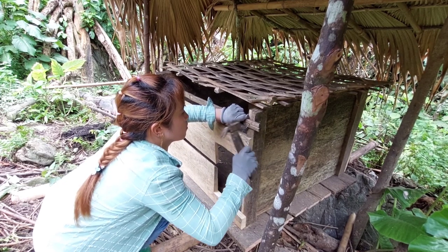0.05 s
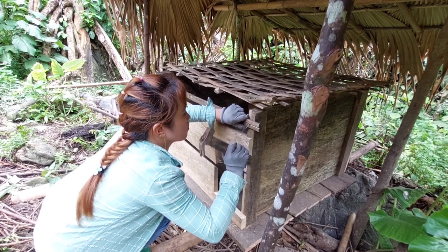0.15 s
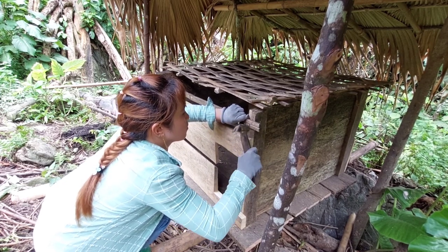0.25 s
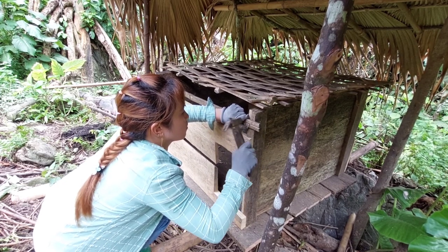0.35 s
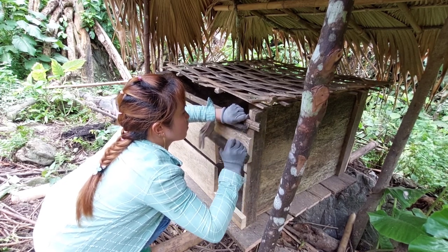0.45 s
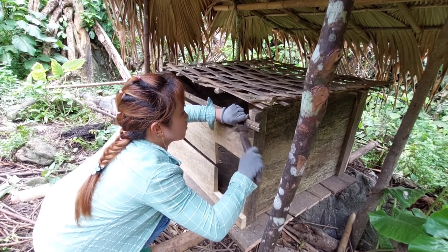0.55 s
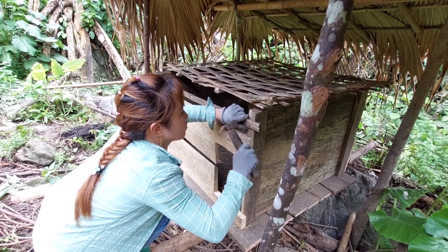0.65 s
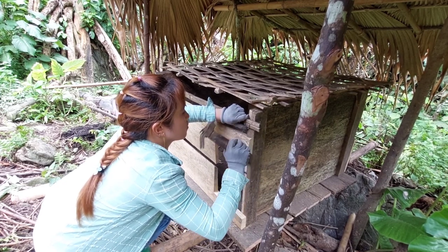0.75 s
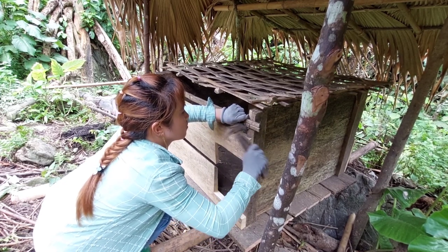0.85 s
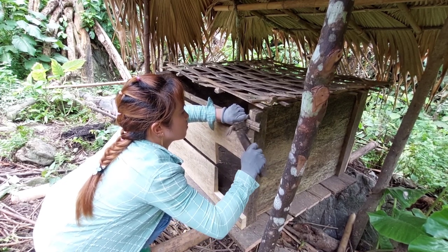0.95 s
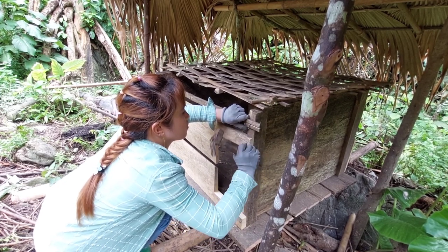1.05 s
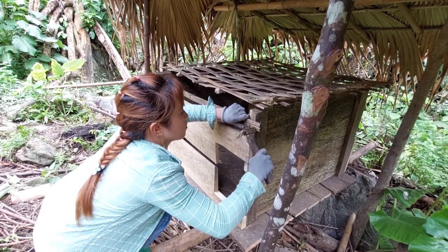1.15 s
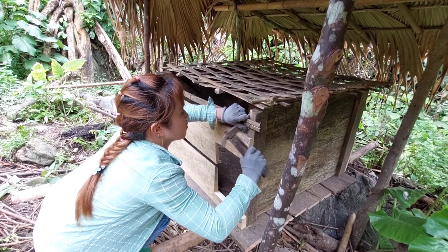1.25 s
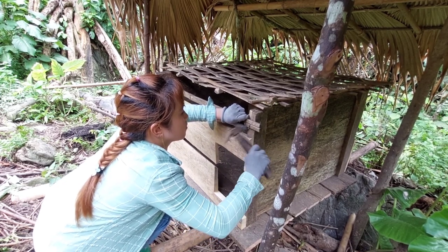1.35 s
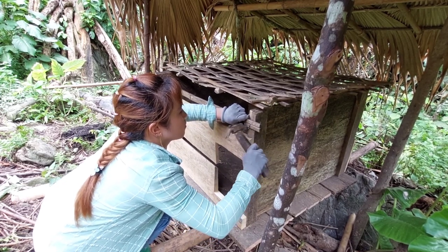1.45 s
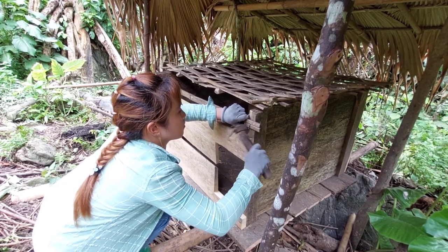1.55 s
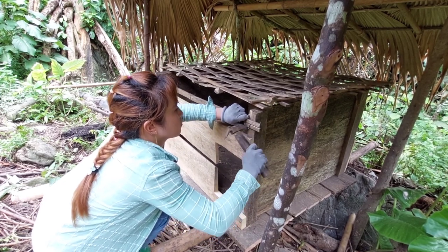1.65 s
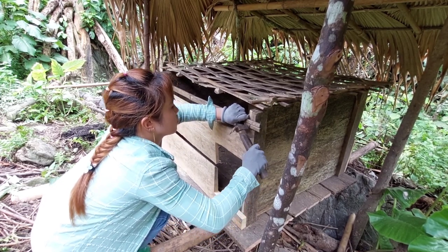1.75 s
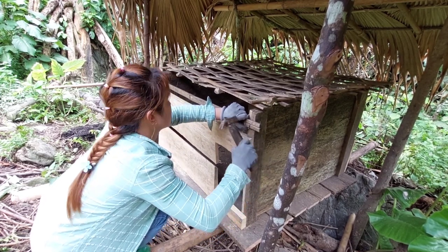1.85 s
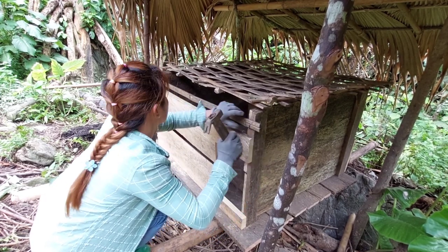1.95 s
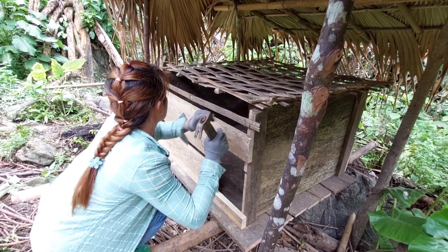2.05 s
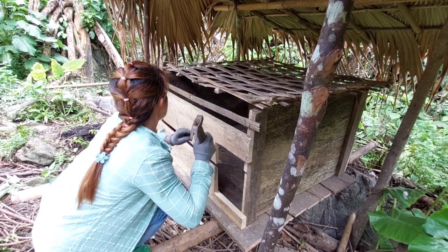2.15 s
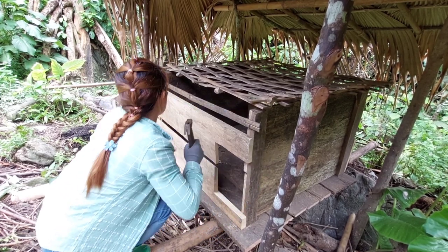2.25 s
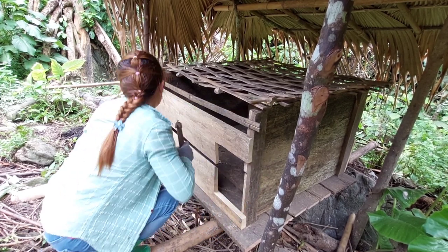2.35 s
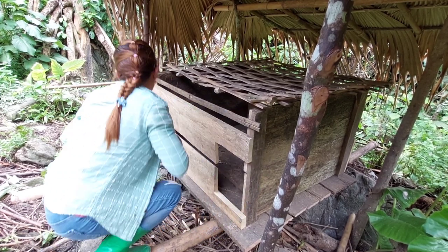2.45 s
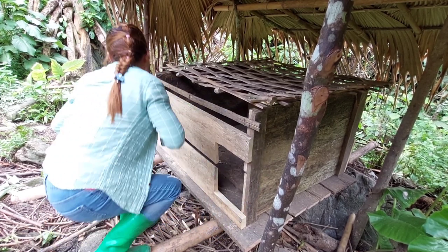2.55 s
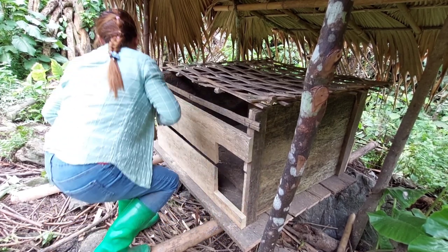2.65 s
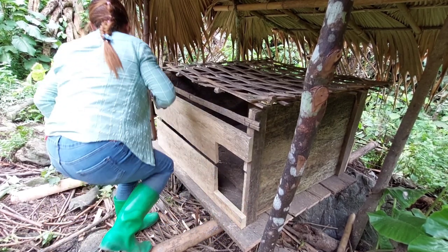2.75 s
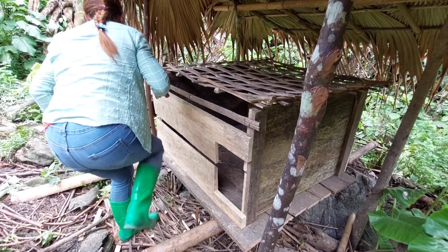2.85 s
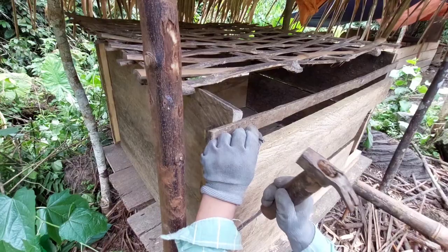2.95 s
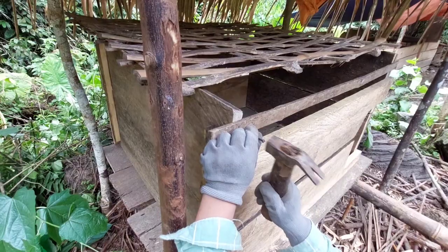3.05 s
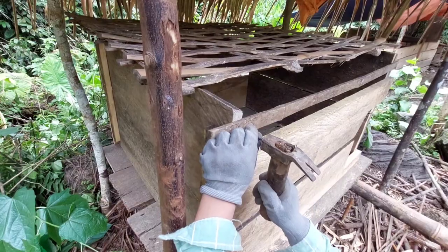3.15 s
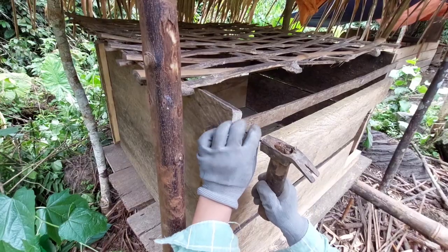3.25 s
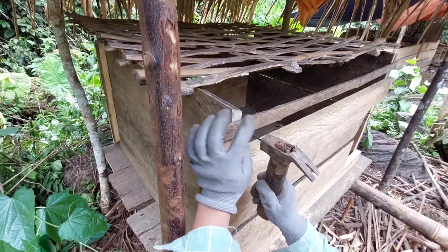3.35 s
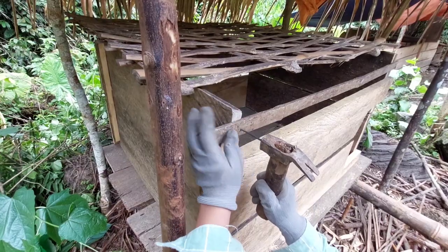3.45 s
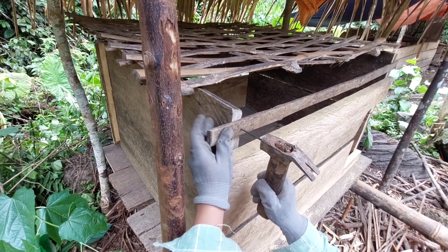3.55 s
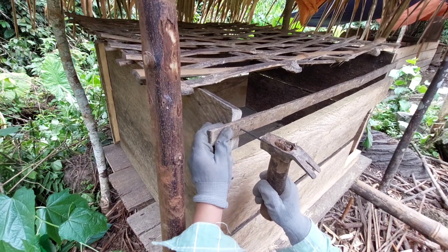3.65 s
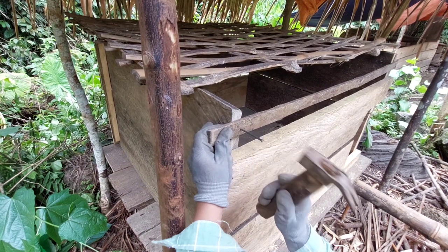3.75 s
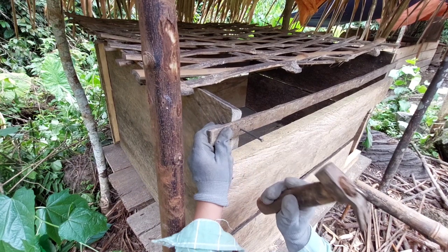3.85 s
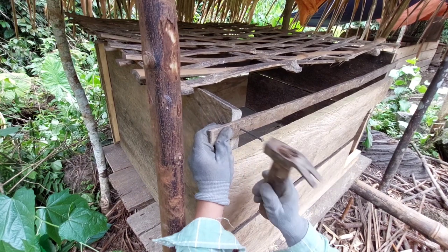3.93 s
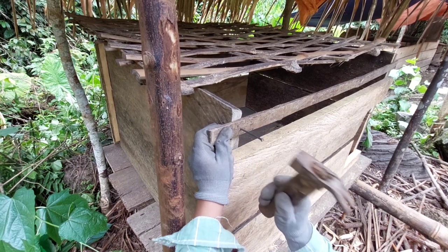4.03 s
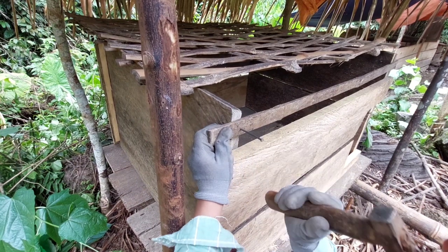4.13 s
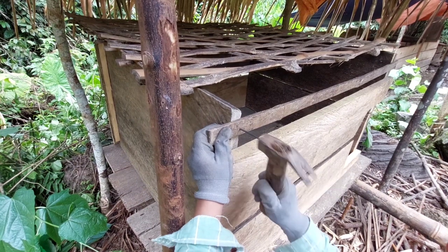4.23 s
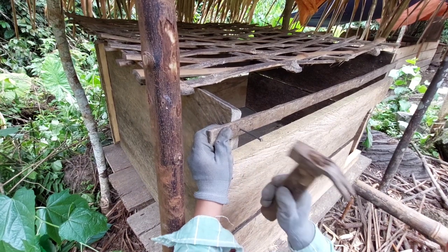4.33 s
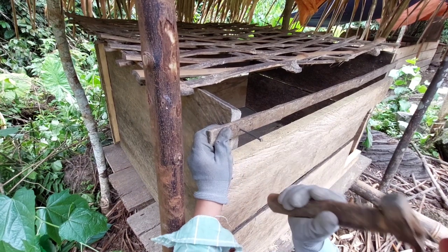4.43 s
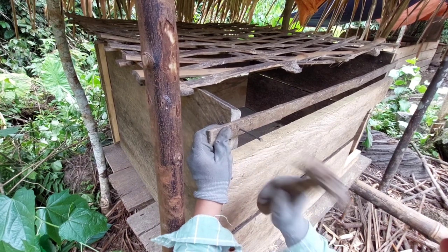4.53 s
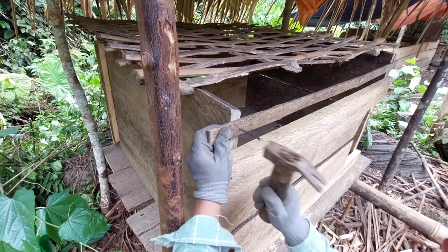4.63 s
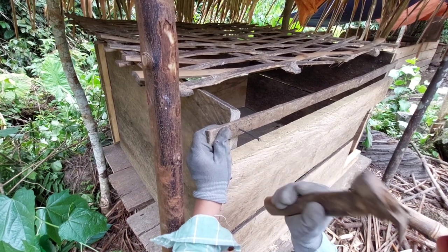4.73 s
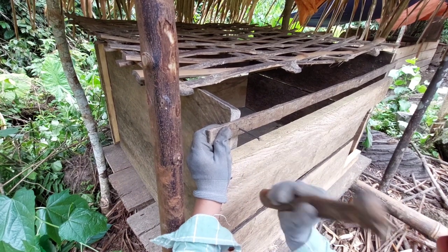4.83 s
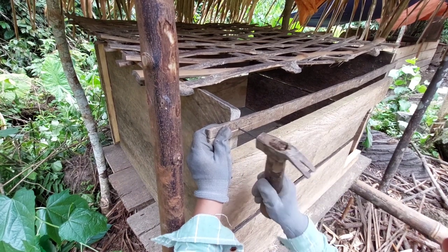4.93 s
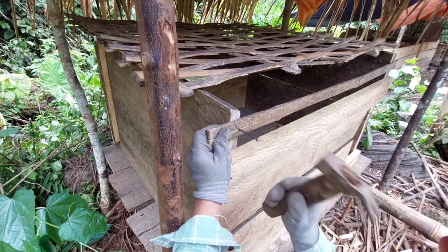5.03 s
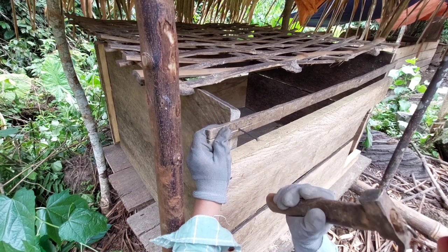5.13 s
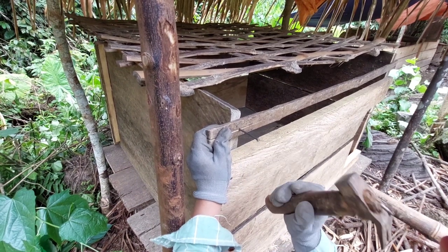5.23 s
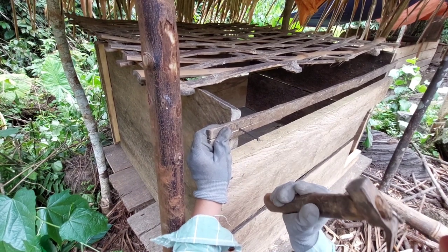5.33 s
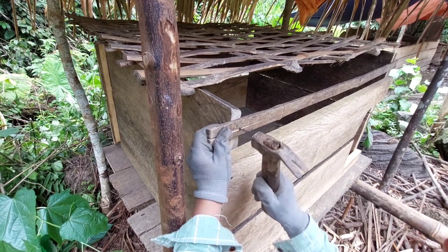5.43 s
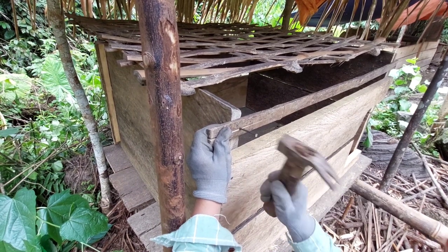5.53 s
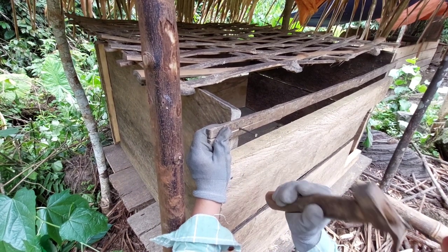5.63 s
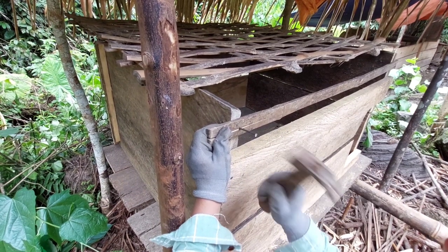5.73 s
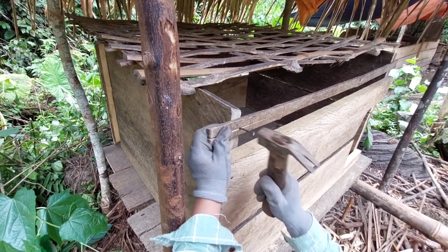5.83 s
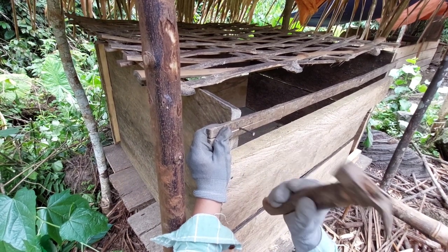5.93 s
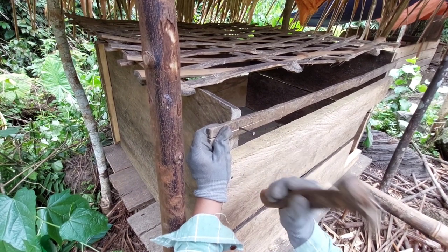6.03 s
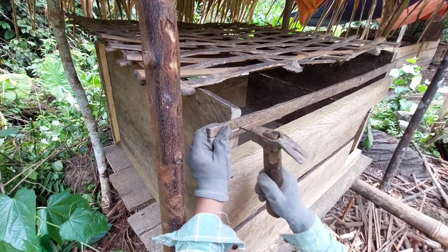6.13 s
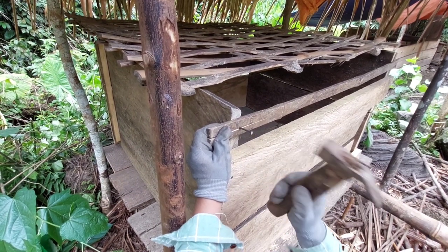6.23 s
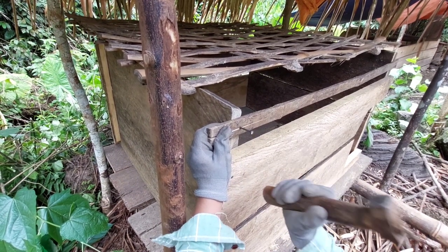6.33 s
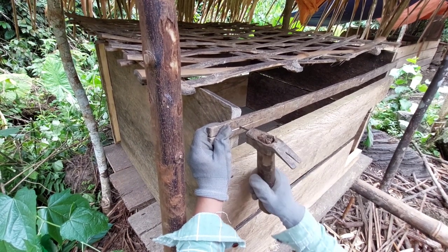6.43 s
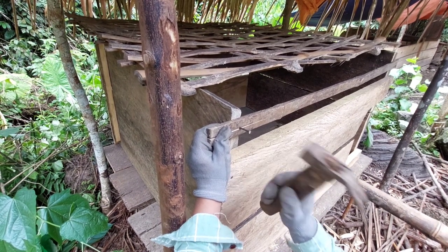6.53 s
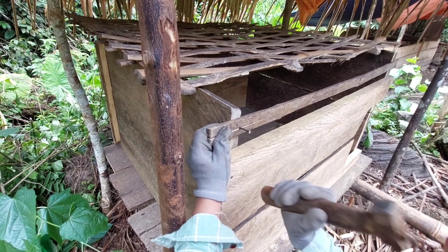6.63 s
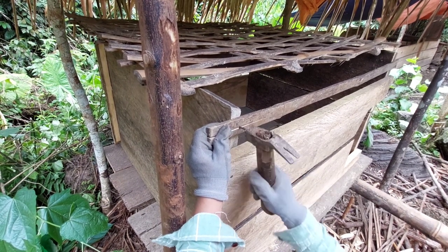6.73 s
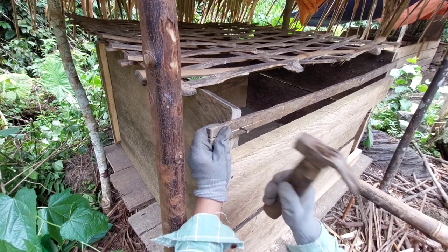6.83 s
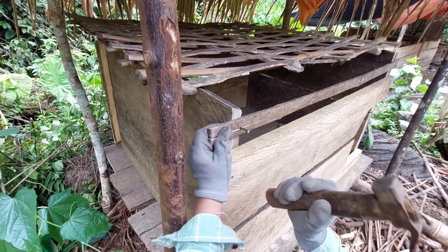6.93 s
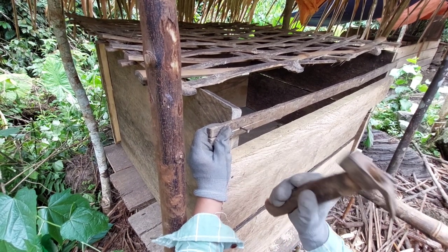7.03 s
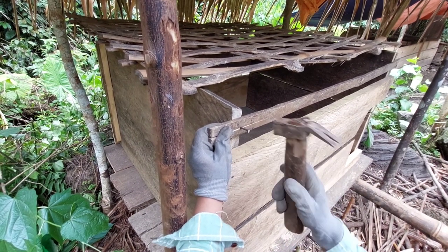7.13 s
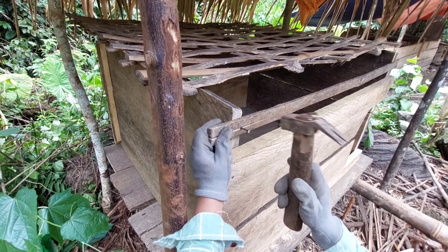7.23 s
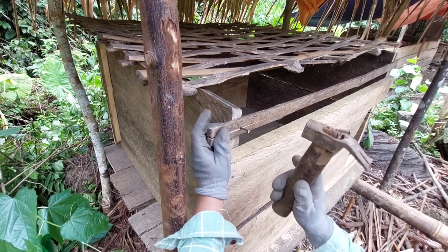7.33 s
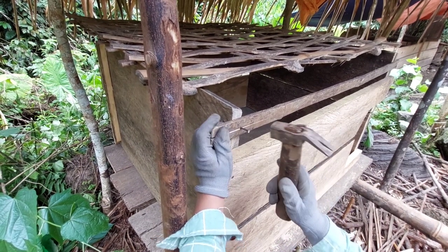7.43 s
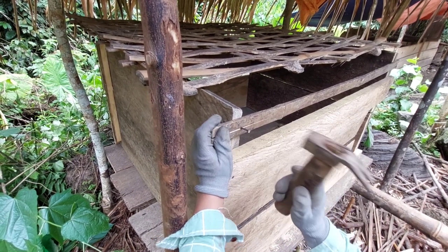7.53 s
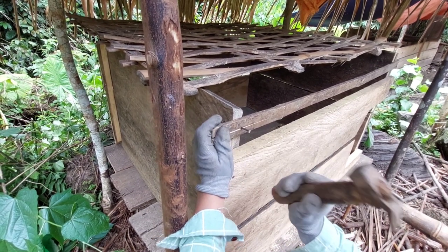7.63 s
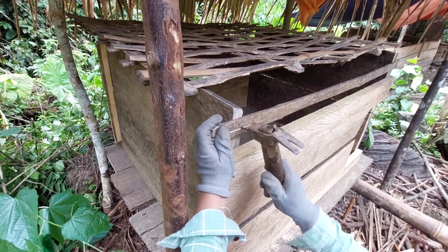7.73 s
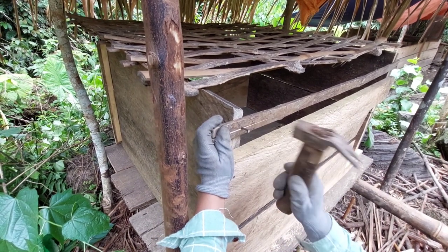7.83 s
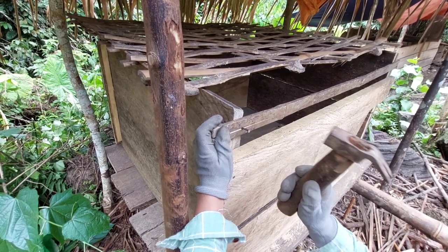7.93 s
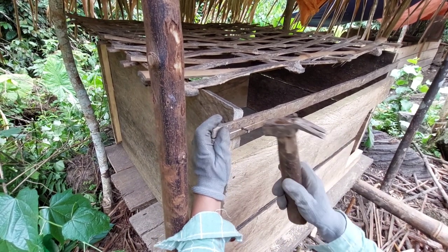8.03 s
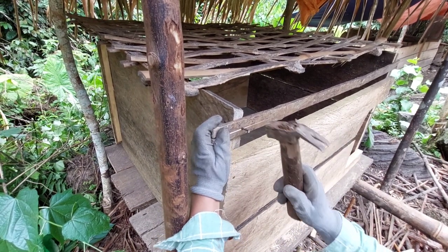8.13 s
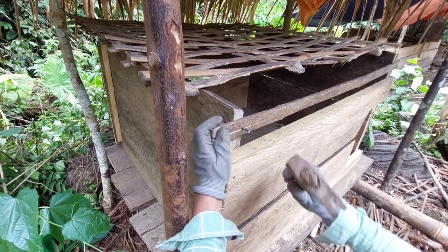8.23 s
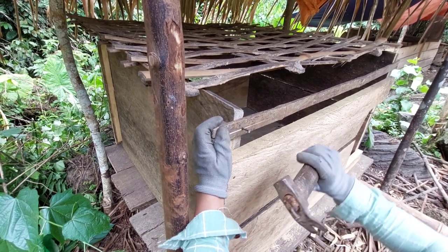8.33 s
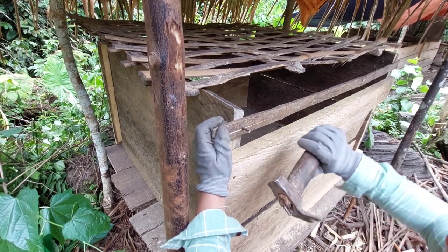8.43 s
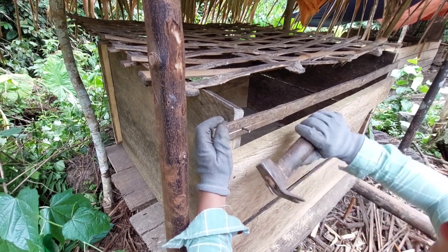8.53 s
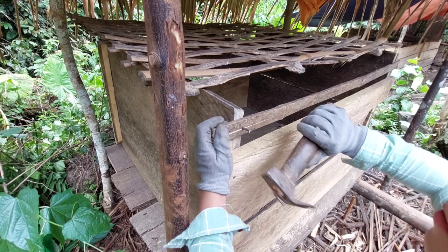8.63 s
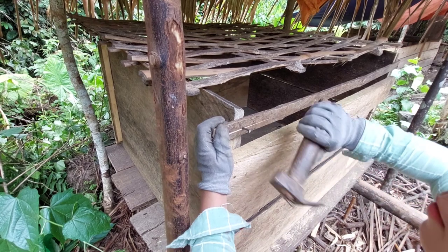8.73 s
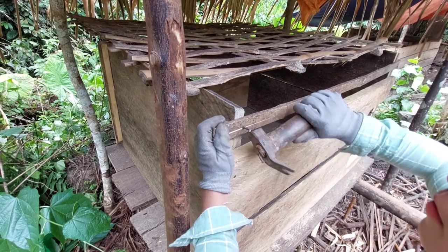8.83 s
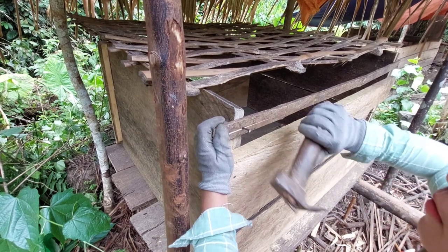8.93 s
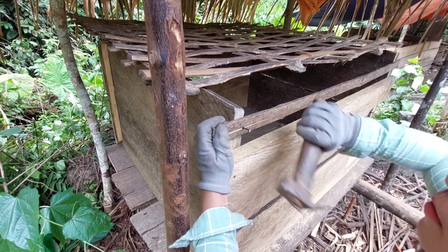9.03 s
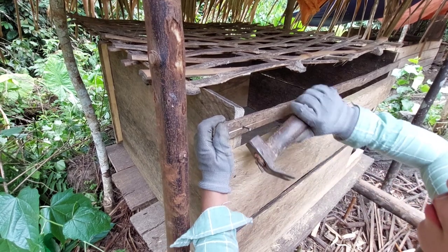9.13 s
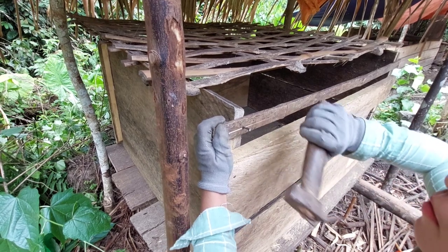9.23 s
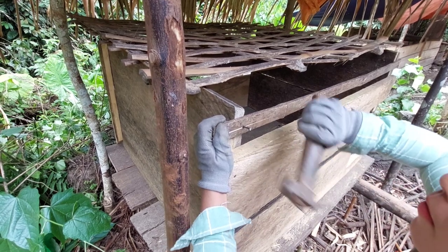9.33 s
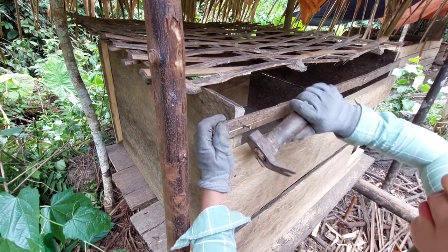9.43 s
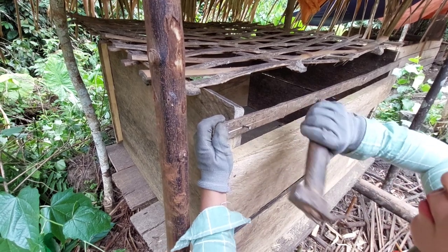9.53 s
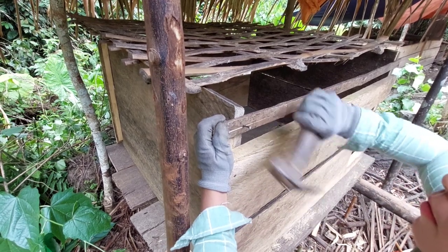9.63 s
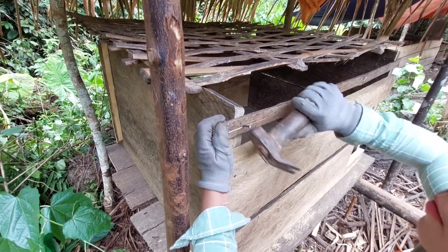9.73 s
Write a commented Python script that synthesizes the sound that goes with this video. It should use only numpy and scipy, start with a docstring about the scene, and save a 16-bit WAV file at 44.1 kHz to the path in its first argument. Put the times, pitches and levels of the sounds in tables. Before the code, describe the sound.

Close stereo sound of nailing at a wooden shelter. Metallic ticks and hollow board knocks run rapidly for two seconds, then stop, leaving a quiet hiss of water, leaves and far insects. Two light taps and a double strike resume the work, followed by steadier blows of varying force, some dull, some piercing, with short scattered rattle, occasional soft air thumps on the left, and three final knocks.

```python
"""A stream, leaves and far insects hiss in a forest clearing: filtered noise with slowly varying level.
Almost at once a steel hammer drives nails into the slats of a small wooden hut. Each blow is a tick of steel
(noise burst and decaying sine), a knock of the boards (a bank of damped modes), then the loose slat slapping its frame.
Woven walls and thatch scatter the sound as fading noise. Single boards ring on, small knocks fall between,
and the swung hammer puffs air into one of the two close microphone ports."""
import sys
import numpy as np
from scipy import signal
from scipy.fft import rfft, irfft
from scipy.io import wavfile
from scipy.ndimage import uniform_filter1d, map_coordinates

SR = 44100
rng = np.random.default_rng(int(sys.argv[2]) if len(sys.argv) > 2 else 0)


def unload_wav(signal):
    """Save mono or channel-first audio to the path in sys.argv[1] as 16-bit WAV at rate SR, clipped to [-1, 1]."""
    wavfile.write(
        sys.argv[1],
        SR,
        np.round(np.clip(np.atleast_2d(signal).T, -1, 1) * 32767).astype(np.int16),
    )


def convert_level_to_amplitude(level_db):
    """Map a level in decibels to its linear amplitude factor."""
    exponent = np.asarray(level_db, float) / 20
    return 10 ** exponent


N = 430857  # length in samples

# Background levels. Each row: time in seconds, rumble level in dB, rush level in dB.
FOREST_LEVELS = [(0.0, -46, -49.5), (0.85, -44, -48), (1.2, -47.5, -52.5), (2.0, -47.5, -51),
                 (2.75, -45.5, -49), (3.07, -43, -45.5), (3.2, -48, -49.5), (4.0, -47, -50),
                 (4.27, -42.5, -44.5), (4.5, -46, -49), (5.4, -48.5, -50), (6.2, -46, -50),
                 (6.45, -42.5, -45.5), (7.75, -45.5, -48.5), (8.2, -40.5, -44.5), (8.7, -43, -44.5),
                 (9.2, -38.5, -43), (9.77, -39.5, -44)]
# Spectrum of the low rumble. Each row: frequency in Hz, relative level in dB.
RUMBLE_SPECTRUM = [(15, -56), (25, -27), (50, 4), (129, -1), (236, -8), (280, -7.5), (430, -8.5),
                   (648, -11.5), (1500, -19), (1950, -89), (3300, -120)]
# Spectrum of stream and leaves. Each row: frequency in Hz, relative level in dB.
RUSH_SPECTRUM = [(530, -26), (900, -25), (1030, -24), (1670, -1.5), (3310, -5.5), (3880, -3.5), (5790, -4),
                 (6620, -7.5), (7660, -6), (8760, -7), (15000, -17), (15900, -30), (16500, -63)]
# Insect choruses. Each row: centre in Hz, half-width to 1/e amplitude in Hz, mean level in dB.
INSECT_CHORUSES = [(5720, 870, -56.5), (7520, 670, -54.5), (9440, 120, -64)]
# Likeness of the two ports in the background. Each row: frequency in Hz, correlation from -1 to 1.
FOREST_LIKENESS = [(60, 0.93), (130, 0.92), (290, 0.88), (640, -0.21), (1410, -0.28), (3100, 0.077),
                   (6820, -0.036), (15000, 0.12)]
# Hammer on nail. Each row: start in seconds, tick level in dB, clatter level in dB, sizzle level in dB,
# pitch of the nail's shank in Hz.
HAMMER_BLOWS = [(0.0447, -5.5, -17, -32, 5800), (0.3461, -11, -28, -33, 6350),
                (0.6554, -9.5, -24.5, -36.5, 6770), (0.9659, -4.5, -22, -41, 6280),
                (1.2313, -3.5, -23, -34, 8230), (1.471, -7.5, -25, -43, 6070),
                (1.6636, -12.5, -24.5, -36, 4780), (1.8428, -14, -25, -35, 5100),
                (3.1805, -15, -23.5, -40, 4180), (3.2269, -19, -32, -48, 4200),
                (4.077, -15.5, -19, -31.5, 4300), (4.362, -38, -19, -33, 4530),
                (4.6863, -15, -16.5, -24.5, 5100), (5.0133, -31, -16.5, -23.5, 5050),
                (5.558, 0, -24, -26.5, 3720), (5.8864, -34.5, -30.5, -27, 2920),
                (6.2126, -5.5, -20, -20.5, 4600), (6.532, -2, -20, -21, 4650),
                (6.8348, -11, -23.5, -28, 7970), (7.8307, -20, -23, -21.5, 5500),
                (8.9242, -25, -27, -31.5, 4730), (9.2101, -9, -25.5, -23, 7800),
                (9.5036, -26, -29.5, -24, 7900)]
# Slat on frame, once after each blow. Each row: start in seconds, then the levels of body, bark, edge
# and boom in dB.
SLAT_SLAPS = [(0.054, -5, -30, -9.5, -24.5), (0.355, -15, -22, -17, -23.5), (0.662, -10, -8, -13, -22),
              (0.974, -8.5, -8.5, -12, -25.5), (1.239, -9, -18.5, -18, -29), (1.48, -12, -8.5, -10, -27.5),
              (1.672, -14, -7.5, -10, -27.5), (1.851, -10, -17.5, -18, -27), (3.185, -20, -16, -21, -34),
              (3.232, -29, -23.5, -30, -64), (4.084, -14.5, -20, -17.5, -35.5),
              (4.378, -24, -26, -16.5, -30.5), (4.699, -24, -33, -15, -28.5), (5.027, -18, -24, -13, -37),
              (5.563, -14.5, -21, -15, -38), (5.902, -25.5, -23, -29, -34), (6.225, -23, -22.5, -26, -27.5),
              (6.5405, -18, -15.5, -21, -27.5), (6.846, -22, -23, -18, -32.5),
              (7.843, -19.5, -21.5, -12, -27), (8.933, -5, -16, -12.5, -25.5),
              (9.22, -16.5, -17, -24.5, -28), (9.509, -16.5, -20, -19.5, -29)]
# Modes of the hut boards. Each row: frequency in Hz, basic t60 in seconds, relative level in dB when struck
# at the near corner, relative level in dB when struck at the far corner.
BOARD_MODES = [(89.7, 0.43, -2, -19), (134.5, 0.355, 2.5, 5.5), (205.6, 0.365, 0, 0.5),
               (255.8, 0.32, -2.5, -2), (290.4, 0.25, -2.5, -0.5), (350.7, 0.222, -4.5, -2),
               (458.3, 0.1436, 0.5, -6), (550, 0.094, 4.5, -15), (604, 0.12, -3, -5.5),
               (682.8, 0.16, 0.5, -8), (794, 0.087, 4.5, -6.5), (878, 0.054, 7, 0.5), (968, 0.084, -11, -6),
               (1065, 0.11, -5, -4), (1167, 0.074, -1.5, -8.5), (1400, 0.055, 4.5, -9),
               (1500, 0.08, -39.5, -24), (1796, 0.027, 2, -11), (2018, 0.067, -8, -6.5),
               (2120, 0.11, -52, -14), (2446, 0.092, -76, -15), (2910, 0.068, -68, -14.5)]
# Scattered sound of a blow, main part. Each row: frequency in Hz, relative level in dB.
CLATTER_SPECTRUM = [(60, -120), (150, 1.5), (500, -8), (1500, 3), (3000, 1), (5000, -4), (8000, -0.5),
                    (9000, -14), (10500, -120)]
# Scattered sound of a blow, top treble. Each row: frequency in Hz, relative level in dB.
SIZZLE_SPECTRUM = [(7500, -120), (9000, -4.5), (10500, 1), (13500, 0), (15500, 0), (17000, -64)]
# Decay of scattered sound. Each row: frequency in Hz, t60 in seconds.
SCATTER_DECAY = [(150, 0.4), (500, 0.23), (1500, 0.15), (4000, 0.12), (8000, 0.12), (14000, 0.14)]
# Likeness of the two ports for the hut. Each row: frequency in Hz, correlation from -1 to 1.
HUT_LIKENESS = [(60, 1), (180, 0.9), (550, 0.83), (1650, 0.026), (4970, -0.091), (15000, -0.061)]
# A loose board sounding on after every slap of a stretch. Each row: stretch start in seconds, stretch end
# in seconds, pitch picking the nearest mode in Hz, level in dB, time of free ringing in seconds.
LINGERING_BOARDS = [(.85, 1.1, 455, -13, .022), (1.1, 1.36, 552, -13, .012), (1.36, 1.76, 455, -13, .021),
                    (6.38, 6.7, 1180, -6, .006), (.85, 1.1, 1060, -29, .09), (.85, 1.57, 352, -31, .07),
                    (1.76, 2.3, 455, -18, .02), (1.36, 2.3, 1410, -19, .016), (2.8, 3.21, 975, -30, .054),
                    (3.7, 5.3, 1060, -27.5, .048), (6.06, 6.38, 975, -24, .026),
                    (6.38, 6.7, 1410, -21, .07), (7.4, 8.3, 2020, -23, .032), (8.5, 9.77, 352, -24, .06),
                    (9.07, 9.36, 134, -27, .054), (9.36, 9.77, 205, -28, .048)]
# Small knocks as the hand shifts on the slat. Each row: start in seconds, level in dB.
HAND_TAPS = [(2.815, -39), (2.934, -39)]
# Air pushed by the swung hammer. Each row: start in seconds, level in dB, time constant in seconds.
AIR_PUFFS = [(4.363, -6.5, .0015), (4.6873, -12, 0.002), (5.013, -14, 0.0015), (5.886, -9, 0.0017),
             (6.837, -12.5, 0.001)]

FOREST_TOP_HZ = 15350  # rumble and rush stop here
CORNER_CHANGE_S = 3.0  # the near corner is struck before this time, the far corner after
FREE_NEAR_S, FREE_FAR_S = 0.0094, 0.093  # how long the joint stays open after a slap
GRIP_NEAR_DB, GRIP_FAR_DB = -15, -3.5  # damping once the joint closes
KNOCK_NEAR_DB, KNOCK_FAR_DB = -6.5, -9  # knock of a blow, against the body of the slap that follows
WEAVE_NEAR_DB, WEAVE_FAR_DB = 5.5, 7  # share of lath and weave in a slap
SIDEWAYS_S = 9.0  # from here the hammer lands on its cheek and the head rings
HEAD_HZ, HEAD_DB, HEAD_T60_S = 9900, -48, .5
LINGER_LAG, PROMPT_T60_S = 0.2063, .15  # slow boards join late, by this share of their t60 beyond a prompt one's


def unit(x):
    """Normalisation: the signal is scaled to an rms of 1."""
    return x / np.sqrt(np.mean(x ** 2) + 1e-20)


def along(points, hz):
    """Logarithmic pitch scale: (Hz, value) points are interpolated over log frequency."""
    f, v = np.transpose(points)
    return np.interp(np.log(hz + 1), np.log(f + 1), v)


def wobble(rate):
    """Slow fluctuation: a smooth random curve passes through `rate` knots a second."""
    knots = rng.standard_normal(int(N * rate / SR) + 4)
    return map_coordinates(knots, [np.arange(N) * rate / SR])


def spread(alike, hz):
    """Interchannel correlation: the angle between mid and side that gives the likeness of the ports."""
    return np.arccos(np.clip(along(alike, hz), -1, 1)) / 2


def hiss(gain, alike, length, size=512):
    """Filtered noise: white noise takes its spectrum over time from gain(hz, t), its width from `alike`."""
    hz, t, z = signal.stft(rng.standard_normal((2, length)), SR, nperseg=size)
    turn = spread(alike, hz)[:, None]
    z = z * gain(hz[:, None], t) * [np.cos(turn), np.sin(turn)]
    mid, side = signal.istft(z, SR, nperseg=size)[1][:, :length]
    return np.array([mid + side, mid - side])


def add(out, s, sound):
    """Superposition: a stereo sound is summed in at time s."""
    k = round(s * SR)
    out[:, k:k + sound.shape[1]] += sound


def forest():
    """Broadband turbulence and narrow choruses: rumble, a patchy rush of water and leaves, shimmering insects."""
    s, rumble_db, rush_db = np.transpose(FOREST_LEVELS)
    t = np.arange(N) / SR
    rumble_db = np.interp(t, s, rumble_db)
    rush_db = np.interp(t, s, rush_db)

    def patchy(spectrum, patchy_db):
        """Random modulation: a spectrum with drifting patches of gain."""
        def gain(hz, t):
            field = uniform_filter1d(rng.standard_normal((len(hz), len(t))), 6, 0)
            field = uniform_filter1d(field, 12, 1)
            return convert_level_to_amplitude(along(spectrum, hz) + patchy_db * unit(field)) * (hz < FOREST_TOP_HZ)
        return gain

    rumble = unit(hiss(patchy(RUMBLE_SPECTRUM, patchy_db=0.5), FOREST_LIKENESS, N, size=2048))
    out = convert_level_to_amplitude(rumble_db + 0.43 * wobble(6.4)) * rumble
    rush = unit(hiss(patchy(RUSH_SPECTRUM, patchy_db=0.44), FOREST_LIKENESS, N))
    out += convert_level_to_amplitude(rush_db + 0.54 * wobble(6)) * rush
    for centre_hz, width_hz, db in INSECT_CHORUSES:
        band = hiss(lambda hz, t: np.exp(-((hz - centre_hz) / width_hz) ** 2), FOREST_LIKENESS, N)
        swell_db = rush_db - rush_db.mean()  # the choruses swell with the rush
        out += convert_level_to_amplitude(db + swell_db + wobble(2.9) + wobble(21)) * unit(band)
    return out


def boards(s, colour, rise, held, scatter_db, lasting=1, damped_db=-8, rattle=0.93, closing=0.013, alone=False):
    """Modal synthesis: modes start together, waver as loose joints rattle, are damped as the joint closes at `held` s."""
    hz, t60, near_db, far_db = np.transpose(BOARD_MODES)[:, :, None]
    t = np.arange(SR // 3) / SR
    corner_db = near_db if s < CORNER_CHANGE_S else far_db
    level = corner_db + along(colour, hz) + scatter_db * rng.standard_normal(hz.shape)
    if alone:  # only the mode nearest to the one given pitch sounds
        off = np.abs(hz - colour[0][0])
        level = np.where(off == off.min(), colour[0][1], -120)
    rise = rise + 0.0021 * (130 / hz) ** 2  # the big panels take longer to get going
    damping_db = damped_db / (1 + np.exp(-(t - held) / closing)) * np.clip(hz / 400, 0, 1)
    ring = convert_level_to_amplitude(level + damping_db - 60 * t / (lasting * t60)) * (1 - np.exp(-t / rise))

    # in step at the contact, astray later
    knots = np.cumsum(rng.standard_normal((len(hz), 41)), 1)
    knot_s = np.linspace(0, t[-1], num=41)
    drift = np.array([np.interp(t, knot_s, k - k[0]) for k in knots])
    phase = 2 * np.pi * hz * t + rattle * drift * (1 - np.exp(-t / 0.0019))

    # the ports hear the high modes out of step
    step = 0.64 * spread(HUT_LIKENESS, hz) * (-1) ** np.arange(len(hz))[:, None]
    left = (ring * np.sin(phase + step)).sum(0)
    right = (ring * np.sin(phase - step)).sum(0)
    return np.array([left, right])


def scattered_clatter(clatter_db, sizzle_db, shank_hz, t):
    """Diffuse scattering: walls and thatch return a blow as dense noise decaying at each pitch's own rate."""
    def colour(hz):
        # a dull blow is dull from the lower treble up
        tilt_db = 0.5 * (sizzle_db - clatter_db) * np.clip(np.log2((hz + 1) / 4500), 0, 1)
        shank_db = 7.8 * np.exp(-np.log((hz + 1) / shank_hz) ** 2 / 0.1)
        clatter = convert_level_to_amplitude(clatter_db + along(CLATTER_SPECTRUM, hz) + tilt_db + shank_db)
        return clatter + convert_level_to_amplitude(sizzle_db + along(SIZZLE_SPECTRUM, hz))

    uneven_db = unit(uniform_filter1d(rng.standard_normal((129, 1)), size=2, axis=0))

    def fade(hz, u):
        # some pitches hang on, others die early
        return convert_level_to_amplitude(-60 * (u / along(SCATTER_DECAY, hz)) ** 0.91 + uneven_db * (2.5 + 32.0 * u))

    scattered = convert_level_to_amplitude(7) * hiss(lambda hz, u: colour(hz) * fade(hz, u), HUT_LIKENESS, len(t), size=256)
    scattered *= 1 - np.exp(-t / .0005)
    clumps = unit(uniform_filter1d(rng.standard_normal(len(t)), 60))  # echoes come in clumps
    return scattered * convert_level_to_amplitude(2.43 * clumps)


def steel_tick(tick_db, shank_hz, t):
    """Impact of steel on steel: a short noise burst, with the nail ringing until the wood grips it."""
    shank = 0.51 * np.sin(2 * np.pi * shank_hz * t) * convert_level_to_amplitude(-60 * t / 0.025)
    burst = signal.lfilter([1, -.7], 1, rng.standard_normal((2, len(t))))
    tick = shank + burst * convert_level_to_amplitude(-60 * t / 0.0081)
    return tick * convert_level_to_amplitude(tick_db) / np.abs(tick).max()


def hammer():
    """Impulsive excitation: each blow sums a steel tick, a knock of the boards and scattered clatter."""
    out, t = np.zeros((2, N + SR)), np.arange(SR // 3) / SR
    for blow, slap in zip(HAMMER_BLOWS, SLAT_SLAPS):
        s, tick_db, clatter_db, sizzle_db, shank_hz = blow
        _, body_db, _, edge_db, _ = slap
        knock_db = body_db + (KNOCK_NEAR_DB if s < CORNER_CHANGE_S else KNOCK_FAR_DB)
        scattered = scattered_clatter(clatter_db, sizzle_db, shank_hz, t)
        tick = steel_tick(tick_db, shank_hz, t)
        colour = [(100, knock_db - 31), (330, knock_db - 8), (500, knock_db), (1000, knock_db),
                  (2000, edge_db - 4.5)]
        knock = boards(s, colour, rise=0.003, held=0.059, scatter_db=4.5)
        head = (s > SIDEWAYS_S) * convert_level_to_amplitude(HEAD_DB - 60 * t / HEAD_T60_S) * np.sin(2 * np.pi * HEAD_HZ * t)
        add(out, s, (scattered + tick + knock + head) * convert_level_to_amplitude([[-.4], [.4]]))  # a little to the right
    return out[:, :N]


def slat():
    """Coupled vibration: the slat springs back on its frame and sounds the whole hut; single boards ring on."""
    out, t = np.zeros((2, N + SR)), np.arange(SR // 3) / SR
    for s, body_db, bark_db, edge_db, boom_db in SLAT_SLAPS:
        near = s < CORNER_CHANGE_S
        held, grip_db = (FREE_NEAR_S, GRIP_NEAR_DB) if near else (FREE_FAR_S, GRIP_FAR_DB)
        colour = [(250, boom_db), (440, body_db), (580, body_db), (750, bark_db), (1100, bark_db), (1400, edge_db)]
        add(out, s, boards(s, colour, rise=.0005, held=held, scatter_db=1.5, damped_db=grip_db))

        # countless small modes of lath and weave
        weave_colour = [(60, -120), (110, boom_db)] + colour + [(2600, edge_db - 16), (4000, -120)]
        dense = lambda hz, u: convert_level_to_amplitude(along(weave_colour, hz) - 60 * u / along(SCATTER_DECAY, hz))
        weave = hiss(dense, HUT_LIKENESS, len(t), size=256) * (1 - np.exp(-t / 0.00044))
        add(out, s, convert_level_to_amplitude(WEAVE_NEAR_DB if near else WEAVE_FAR_DB) * weave)

    mode_t60 = [mode[:2] for mode in BOARD_MODES]
    for start, end, hz, db, held in LINGERING_BOARDS:
        lag = LINGER_LAG * max(along(mode_t60, hz) - PROMPT_T60_S, 0)
        for s, *_ in SLAT_SLAPS:
            if start < s < end:
                add(out, s + lag, boards(s + lag, [(hz, db)], alone=True, rise=.0015, held=held, scatter_db=0,
                                         lasting=3.5, damped_db=-32, rattle=.25, closing=.003))
    for s, db in HAND_TAPS:
        colour = [(600, db - 15), (1500, db)]
        add(out, s, boards(s, colour, rise=.0012, held=.012, scatter_db=2, damped_db=-20))
    return out[:, :N]


def puffs():
    """Displaced air: one dip of pressure and a slower rebound, in the left port only."""
    out, t = np.zeros((2, N + SR)), np.arange(SR // 20) / SR
    for s, db, length in AIR_PUFFS:
        u = t / length
        dip = u * (1 - u / 2) * np.exp(-u)
        add(out, s, -convert_level_to_amplitude(db) * np.array([[1], [0]]) * dip / dip.max())
    return out[:, :N]


def scene():
    """Superposition: the forest, the hammering, the answering hut and the puffs of air are summed."""
    return forest() + hammer() + slat() + puffs()


def gain_control(x, above_db, ratio, settle_s):
    """Level compression: loud moments turn the gain down, and it creeps back, both by one time constant."""
    level_db = 10 * np.log10(np.abs(uniform_filter1d((x ** 2).mean(0), size=441)) + 1e-12)
    keep = np.exp(-1 / (settle_s * SR))
    excess_db = signal.lfilter([1 - keep], [1, -keep], np.clip(level_db - above_db, 0, None))
    return x * convert_level_to_amplitude(-ratio * excess_db)


def top_cut(x):
    """Nothing passes above the cut-off."""
    return signal.sosfilt(signal.butter(12, 16810, fs=SR, output="sos"), x)


def record(dry):
    """Band limiting and saturation: gain control, loss of lowest bass and top treble, soft rounding of peaks."""
    hz = np.fft.rfftfreq(N, 1 / SR)
    levelled = gain_control(dry, above_db=-31.5, ratio=0.49, settle_s=0.93)
    bass_cut = (1j * hz) ** 2 / (50 + 1j * hz) ** 2
    treble_cut = 1 / np.sqrt(1 + (hz / 15600) ** 40)
    heard = irfft(rfft(levelled) * bass_cut * treble_cut, N)
    soft = heard / (1 + np.abs(heard / .98) ** 4) ** (1 / 4)
    return top_cut(soft)


dry = scene()
out = record(dry)
unload_wav(out)
```